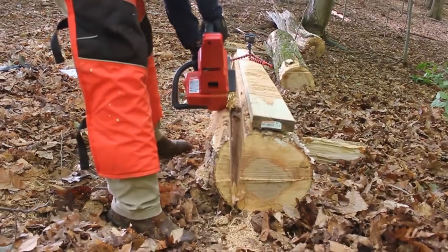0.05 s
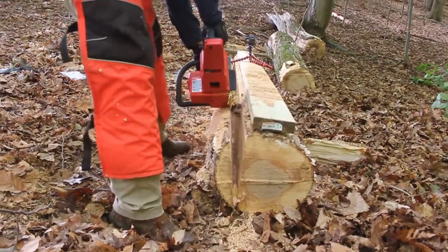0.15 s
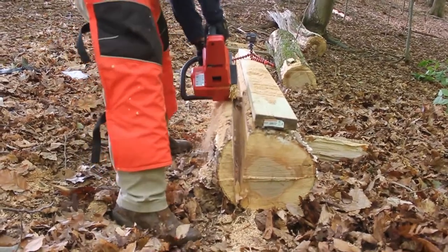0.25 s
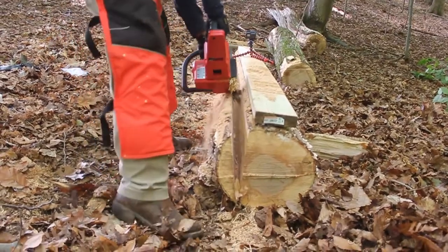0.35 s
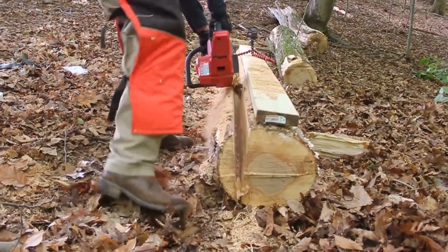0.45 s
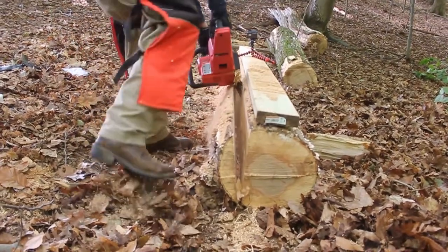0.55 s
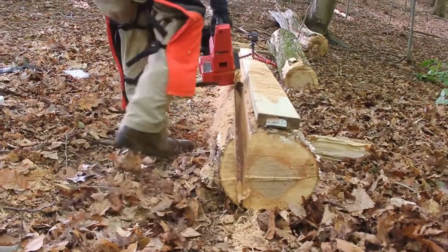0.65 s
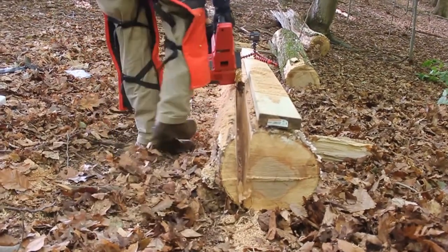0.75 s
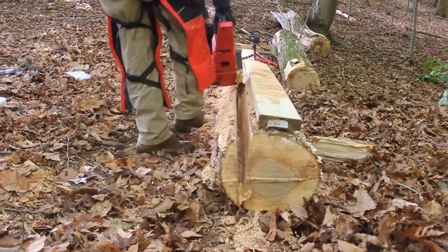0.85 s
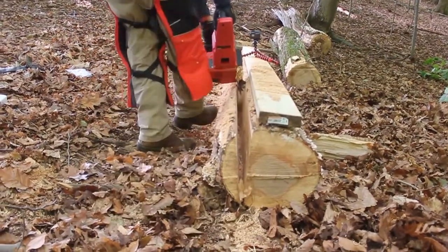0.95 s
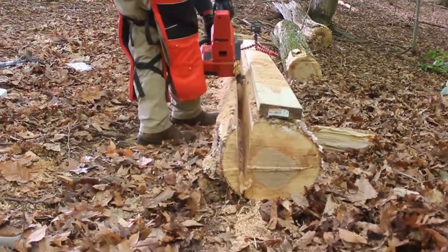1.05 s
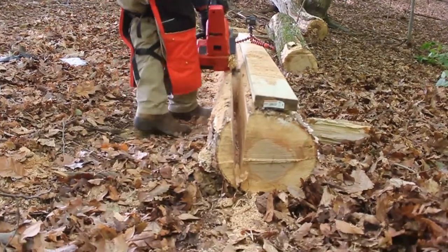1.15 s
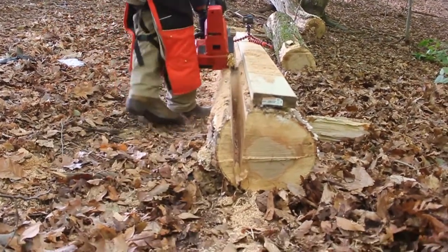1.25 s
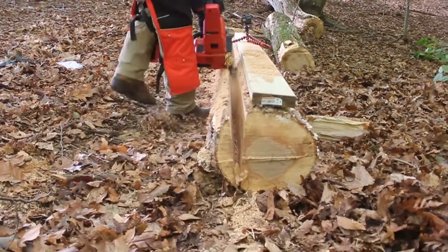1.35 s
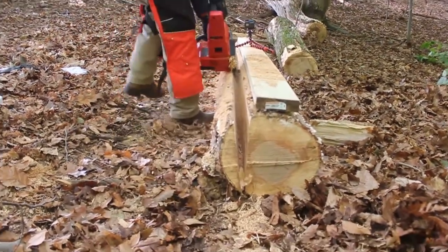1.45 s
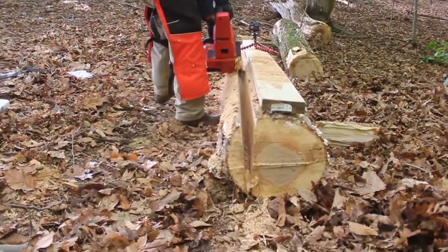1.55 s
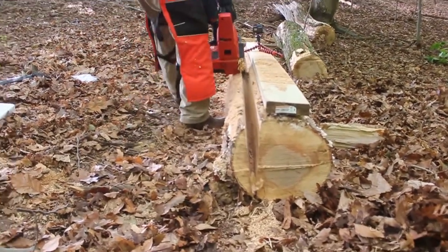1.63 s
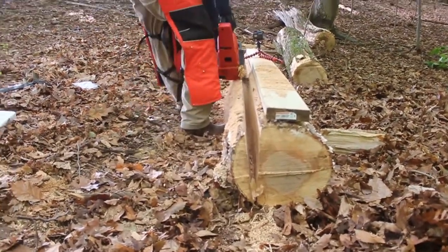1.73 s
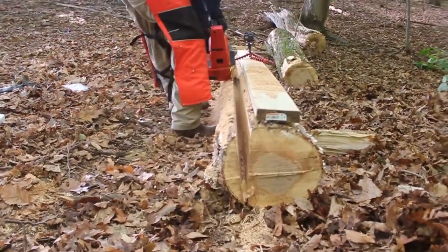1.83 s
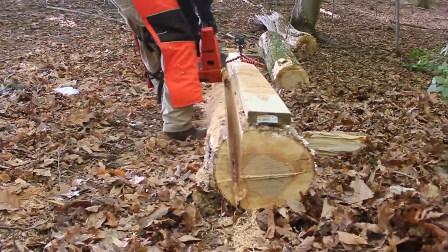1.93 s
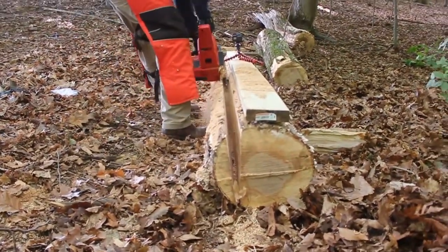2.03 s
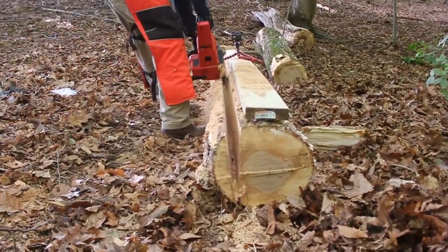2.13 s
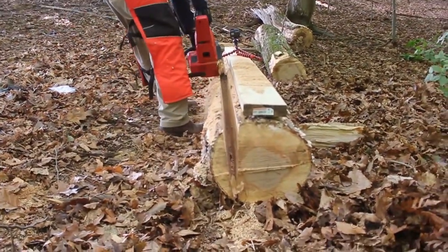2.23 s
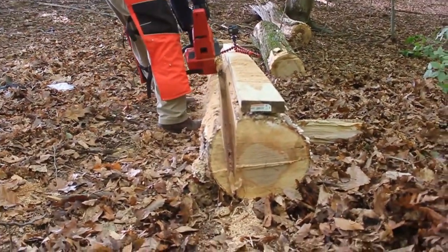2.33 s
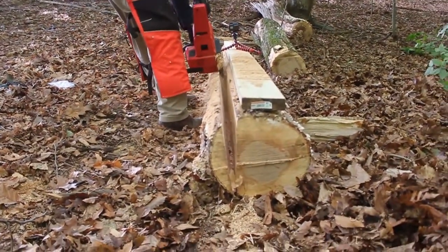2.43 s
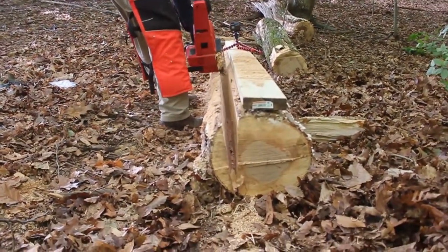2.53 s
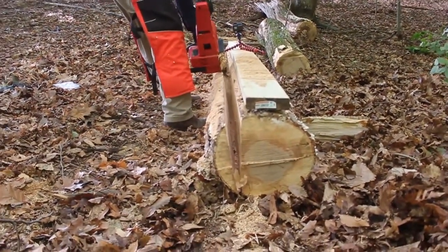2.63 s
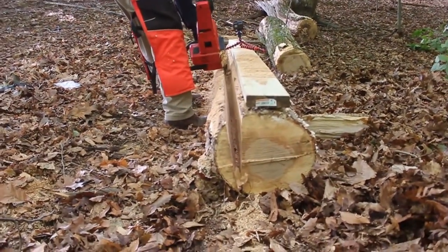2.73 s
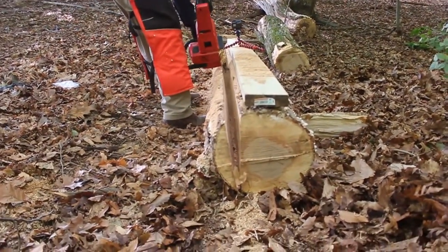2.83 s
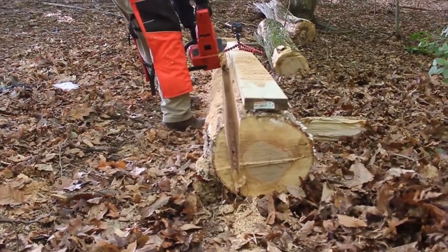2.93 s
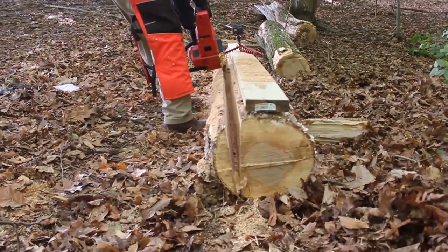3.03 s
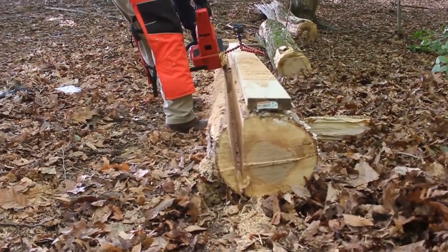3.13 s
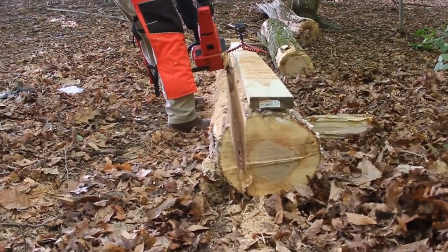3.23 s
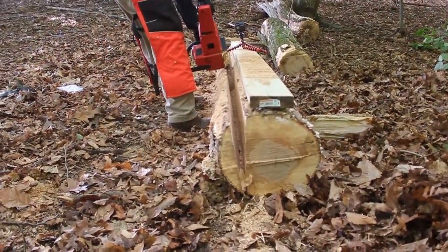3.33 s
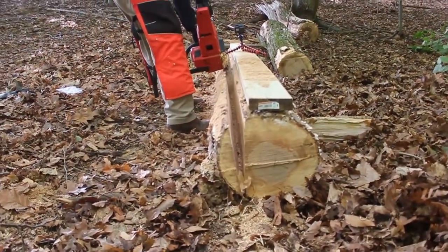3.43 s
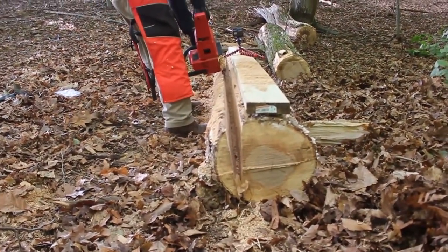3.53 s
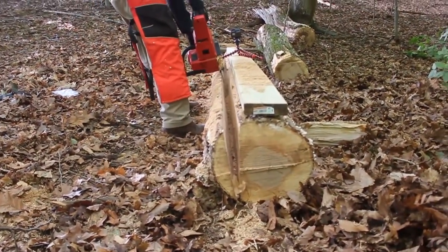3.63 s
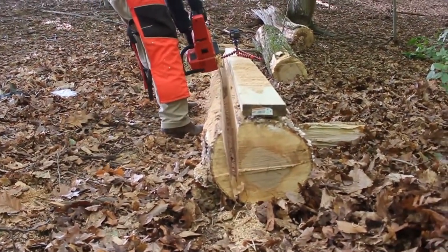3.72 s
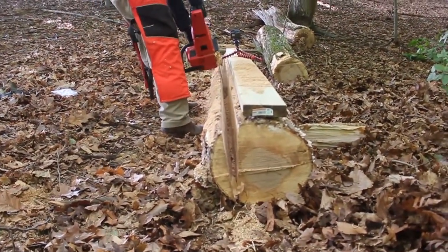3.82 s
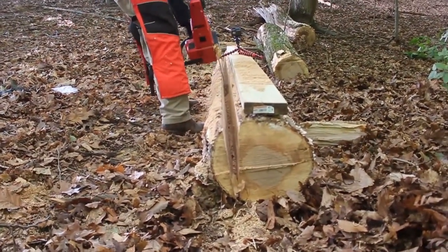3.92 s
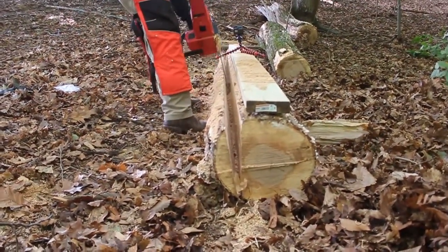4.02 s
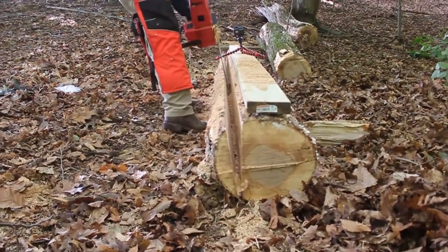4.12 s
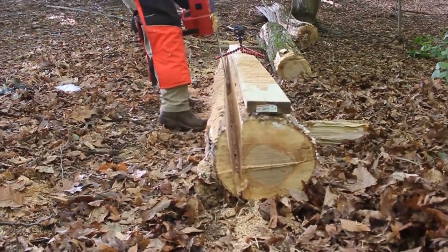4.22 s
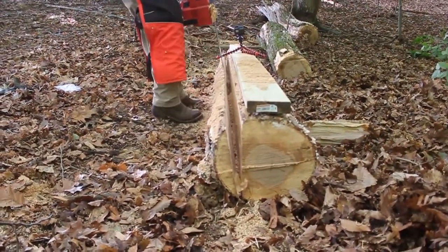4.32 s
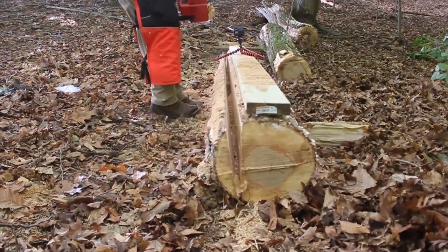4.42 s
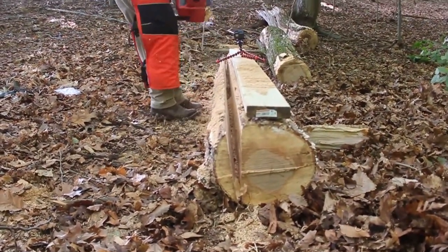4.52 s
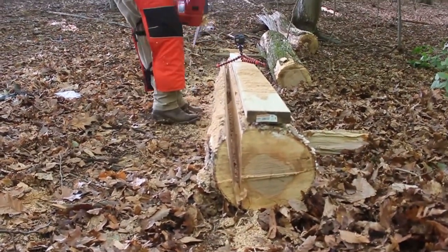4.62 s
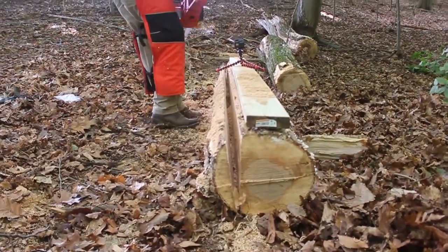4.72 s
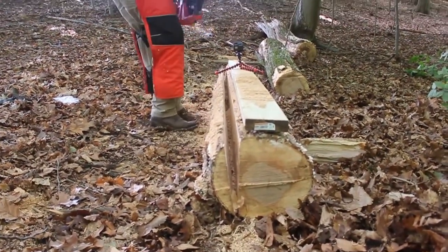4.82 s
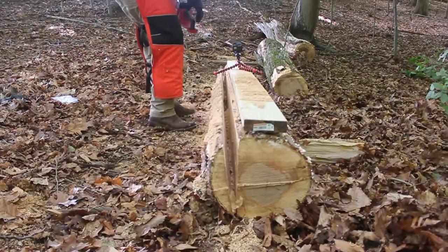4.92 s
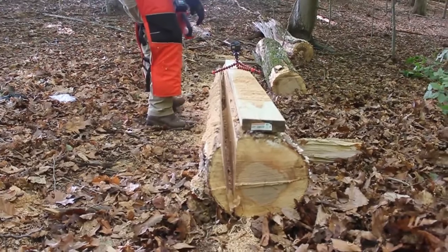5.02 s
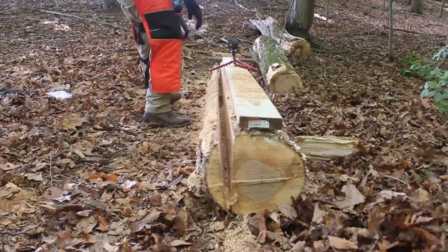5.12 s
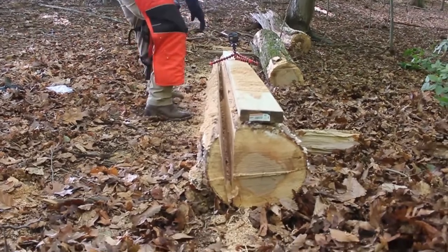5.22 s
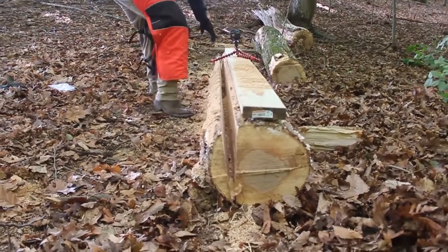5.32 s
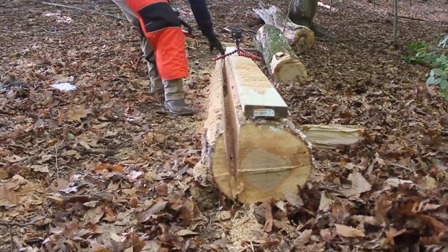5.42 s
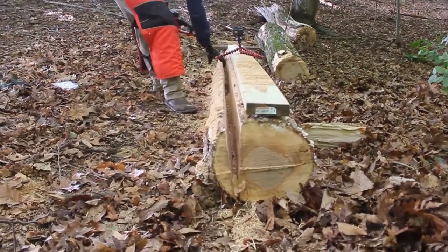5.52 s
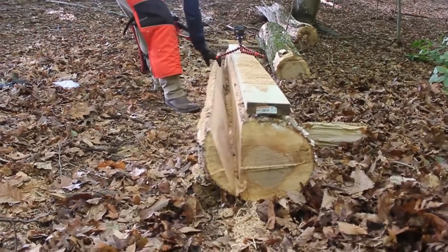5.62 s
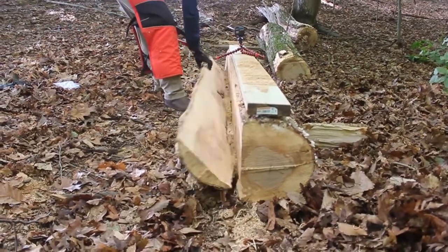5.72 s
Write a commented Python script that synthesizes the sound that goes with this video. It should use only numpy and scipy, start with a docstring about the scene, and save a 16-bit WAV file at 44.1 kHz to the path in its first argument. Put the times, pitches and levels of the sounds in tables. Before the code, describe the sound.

A bright electric whine with dense chain rattle and hissing chips falls away, pauses for a leafy step, and springs back almost instantly. The pitch sags and chatters in the cut, recovers, then slides down to rest with two metallic clacks. Afterwards come soil scuffs, crisp leaves, twig snaps and a burst of woody knocks with splintering. Dry open-air woodland, centred sound, faint hush and low breeze.

```python
"""In a wood, a battery chainsaw rips a log lengthwise: it coasts to a stop, starts again, labours and runs down.
One chain speed steers its whine (sines), rattle and clinks (filtered ticks), chips (noise), chatter and whistle.
The sawyer's boots scuff soil, crush dry leaves (noise and ticks) and snap twigs (short filtered bursts).
The slab knocks loose from the log as decaying modes with splintering noise.
Behind lie a faint hush and a light breeze that rumbles on the nearly mono microphone."""
import sys
import numpy as np
from scipy.fft import rfft, irfft, next_fast_len
from scipy.io import wavfile
from scipy.ndimage import map_coordinates

SR = 44100
rng = np.random.default_rng(int(sys.argv[2]) if len(sys.argv) > 2 else 0)


def file_out(sig):
    """Save sig as 16-bit WAV at sys.argv[1]."""
    # one column per channel
    cols = np.atleast_2d(sig).T
    # limit, then scale
    lim = np.clip(cols, -1, 1)
    pcm = np.round(lim * 32767).astype(np.int16)
    wavfile.write(sys.argv[1], SR, pcm)


N = 254016  # length in samples


def amp(db):
    """Decibels to gain."""
    return 10 ** (np.asarray(db) / 20)


def unit(x):
    """Scale to rms 1."""
    return x / np.sqrt(np.mean(x ** 2) + 1e-20)


def along(points, hz):
    """(Hz, dB) points read on a log frequency axis."""
    f, v = np.transpose(points)
    return np.interp(np.log(hz + 1), np.log(f + 1), v)


def curve(rows):
    """One value per sample from (s, value) rows."""
    return np.interp(np.arange(N) / SR, *np.transpose(rows))


def wobble(rate):
    """A smooth random curve, rate knots a second."""
    knots = rng.standard_normal(int(N * rate / SR) + 4)
    return map_coordinates(knots, [np.arange(N) * rate / SR])


def swell(s, half_length):
    """A smooth rise and fall of height 1 around time s; it falls to 1/e at half_length."""
    return np.exp(-((np.arange(N) / SR - s) / half_length) ** 2)


def coloured(x, colour):
    """x through a causal (minimum-phase) filter whose gain in dB is colour(Hz)."""
    size = 2 * next_fast_len(x.shape[-1] // 2 + 4096)
    cepstrum = irfft(np.log(amp(colour(np.fft.rfftfreq(size, 1 / SR)))))
    # folding the cepstrum onto positive time makes the filter causal
    cepstrum[1:size // 2] *= 2
    cepstrum[size // 2 + 1:] = 0
    return irfft(rfft(x, size) * np.exp(rfft(cepstrum)))[..., :x.shape[-1]]


def noise(points):
    """Noise of rms 1 with a (Hz, dB) spectrum."""
    return unit(coloured(rng.standard_normal(N), lambda hz: along(points, hz)))


def resonance(hz, centre, width):
    """Gain in dB of one band-pass resonance; doubled, it acts as two in a row."""
    return 20 * np.log10(np.abs(hz * width / (centre ** 2 - hz ** 2 + 1j * hz * width)) + 1e-6)


def peaks(rows, hz):
    """Summed lift in dB of (Hz, width Hz, dB) humps."""
    return sum(db / (1 + (2 * (hz - centre) / width) ** 2) for centre, width, db in rows)


def grains(rate, spread_db):
    """Random ticks of uneven size, rate a second, scaled to rms 1."""
    ticks = (rng.random(N) < rate / SR) * rng.standard_normal(N)
    return unit(ticks * amp(spread_db * np.clip(rng.standard_normal(N), -2, 2)))


def burst(t60):
    """A puff of noise that falls by 60 dB in t60 seconds."""
    t = np.arange(SR // 5) / SR
    return rng.standard_normal(len(t)) * 1000 ** (-t / t60)


def add(track, s, db, sound):
    """Mix a sound in at time s with the given peak level."""
    part = track[round(s * SR):][:len(sound)]
    part += amp(db) * sound[:len(part)] / np.abs(sound).max()


TEETH = 6  # teeth on the sprocket
FULL_HZ = 570  # teeth passing per second at nominal full speed
BOG_HZ = 13  # loss of speed at which the bar counts as buried in the wood
SURGE_DB = 4.5  # the chain is louder at the greatest acceleration
# Pace of the chain with the trigger held, dragged down by the cut.
# Each row: time in seconds, teeth passing the sprocket in Hz.
CHAIN_SPEED = [(1.06, 568.4), (1.14, 574.5), (1.44, 569.6), (1.6, 576.3), (1.78, 564.7), (1.87, 573.0),
               (2.02, 566.6), (2.2, 564.7), (2.41, 536.8), (2.48, 554.8), (2.66, 556.2), (2.8, 570.6),
               (3.23, 570.4), (3.31, 566.4), (3.41, 572.2), (3.69, 563.6)]


def saw():
    """One sprocket speed sets the whine, the rattle and ring of the links, the chips, chatter and whistle."""
    fast, coasting, rattle, ring = trigger()
    held_speed = curve(CHAIN_SPEED)
    speed = fast * held_speed
    teeth = 2 * np.pi * np.cumsum(speed) / SR  # phase in radians, one turn per tooth
    buried = np.clip((FULL_HZ - held_speed) / BOG_HZ, 0, 1)
    pull = np.maximum(np.gradient(fast), 0)
    surge = amp(SURGE_DB * pull / pull.max())
    chain = surge * (links(teeth, fast, rattle, ring) + chips(fast))
    motor = np.sqrt(surge) * whine(speed, teeth, buried, coasting)
    return chain + motor + kerf(teeth) + whistle(speed, teeth, buried) + clacks()


SPIN_UP_S = 0.083  # the motor soft-starts
SLACKEN_S = 0.058  # the chain goes slack after release
TAUT_RING_DB = -18  # ring of the driven chain over its rattle, before the mix in links()
# Pulls of the trigger.
# Each row: pressed in seconds, released in seconds, chain at rest in seconds, rattle in dB before the mix,
# share of full speed below which the rattle fades, ring of the coasting chain in dB over the rattle before the mix.
TRIGGER_PULLS = [(-1, 0.15, 0.58, -25, 0.51, -4.5), (0.866, 3.7, 4.122, -24, 0.31, -17)]


def trigger():
    """Share of full speed, coasting (0-1) and gains of rattle and ring as the motor starts and friction stops it."""
    t = np.arange(N) / SR
    spin, coasting, rattle, ring = np.zeros((4, N))
    for on, off, rest, rattle_db, fade_share, slack_db in TRIGGER_PULLS:
        rise = 1 - np.exp(-(np.maximum(t - on, 0) / SPIN_UP_S) ** 2)
        # after release, friction slows the chain at a steady rate
        share = rise * np.clip((rest - t) / (rest - off), 0, 1)
        free = np.clip((t - off) / SLACKEN_S, 0, 1) * (share > 0)
        level = amp(rattle_db) * share / np.hypot(share, fade_share)
        spin += share
        coasting += free
        rattle += level
        ring += level * amp(TAUT_RING_DB + free * (slack_db - TAUT_RING_DB))
    return spin, coasting, rattle, ring


# Broad colour of the saw. Each row: frequency in Hz, gain in dB.
SAW_COLOUR = [(90, -63), (190, -28), (290, -15), (600, -10.5), (1200, -10), (3000, -8), (6000, -9),
              (7000, -27.5), (11000, -19.5), (15600, -40)]
# Resonances of bar and housing. Each row: centre in Hz, width in Hz, lift in dB.
BODY_PEAKS = [(667, 177, 6), (887, 160, 11.5), (1167, 172, 10.5), (1519, 173, 10), (1918, 185, 5.5),
              (2180, 140, 3), (2700, 394, 8.5), (3545, 350, 4), (4130, 290, 2), (5080, 390, 7),
              (5345, 160, 9)]


def body(hz):
    """Gain in dB with which bar and housing radiate each frequency."""
    return along(SAW_COLOUR, hz) + peaks(BODY_PEAKS, hz)


def links(teeth, fast, rattle, ring):
    """Links slap the bar in step with the teeth; a slow chain breaks up into single clinks."""
    dense = np.sqrt(fast) * grains(rate=14000, spread_db=2)
    clinks = np.sqrt(1 - fast) * grains(rate=2500, spread_db=2)
    tooth_beat = 1 + 0.22 * np.cos(teeth) + 0.11 * np.cos(teeth / 2)
    unevenness = amp(0.16 * wobble(250) + 0.73 * wobble(14))
    slaps = unit((dense + clinks) * tooth_beat * unevenness)
    slapping = unit(coloured(slaps, lambda hz: body(hz) + along([(6000, 2.0), (7500, 0.5)], hz)))
    ringing = unit(coloured(slaps, lambda hz: 2 * resonance(hz, 5250, 430)))
    return amp(-1.0) * rattle * slapping + amp(2) * ring * ringing


SPRAY_GROWS = 1.3  # power of the chain's speed
# Colour of flying chips. Each row: frequency in Hz, relative level in dB.
CHIP_COLOUR = [(3000, -55), (6500, 4.5), (10700, 3), (15600, 0)]
# Chips thrown at full speed. Each row: time in seconds, level in dB before flutter and surge.
CHIP_LEVEL = [(.1, -37), (1.1, -37), (2.6, -40), (3.1, -35.5), (3.7, -37)]


def chips(fast):
    """Chips fly off as fluttering noise that grows with chain speed."""
    flutter_db = 1.0 * wobble(200)
    return noise(CHIP_COLOUR) * amp(curve(CHIP_LEVEL) + flutter_db) * fast ** SPRAY_GROWS


# all lines of the drive, and their change when buried or coasting
WHINE_DB, BURIED_DB, COASTING_DB = 1, -2.5, -4.4


def whine(speed, teeth, buried, coasting):
    """The drive's lines sink in the cut and on release, and vanish on a very slow chain."""
    fade_in = np.clip(speed / 100 - 0.4, 0, 1)
    level_db = WHINE_DB + BURIED_DB * buried + COASTING_DB * coasting
    return drive(speed, teeth) * fade_in * amp(level_db)


SOFTNESS_DB = 0.57  # scales the fading of upper lines on a slow chain, per multiple of the tooth rate
# Lines of the drive. Each row: multiple of the sprocket's turn rate, rms in dB at full speed before the whine's gains.
DRIVE_LINES = [(4, -53), (6, -33.5), (8, -73), (9, -47), (11.55, -39), (12, -31.5), (16, -47), (17, -43),
               (18, -48), (23.1, -43.5), (24, -41.5), (30, -40.5), (36, -43), (52, -42.5), (58, -47.5),
               (66.4, -48.5), (104, -54)]
# Bar and gear case ring when a line sweeps through.
# Each row: centre in Hz, width in Hz, lift in dB before the sweep is exaggerated.
FLARE_PEAKS = [(310, 55, 5.5), (856, 84, 3), (1600, 110, 4.5), (2017, 92, 11), (4200, 570, 5.5),
               (5750, 280, 5.5)]


def drive(speed, teeth):
    """Lines of sprocket and gears; each flares as it sweeps through a resonance."""
    grid = np.arange(0, SR // 2, 10)
    response = body(grid) + peaks(FLARE_PEAKS, grid)
    slowness = 1 - speed / FULL_HZ
    out = np.zeros(N)
    for order, db in DRIVE_LINES:
        k = order / TEETH
        lift_db = np.interp(k * speed, grid, response) - np.interp(k * FULL_HZ, grid, response)
        # teeth that meet slowly strike softly, so the upper lines fade first
        softness_db = SOFTNESS_DB * k * (slowness ** 2 + 3 * slowness ** 4)
        # links seat unevenly, which blurs the upper lines most, and more so on a slow chain
        slip = 0.1 * min(k, 6) * (1 + 2 * np.abs(slowness)) * wobble(110)
        flutter_db = 0.68 * min(k, 3) * wobble(45)
        out += amp(db + 1.12 * lift_db - softness_db + flutter_db) * np.sin(k * teeth + slip)
    return np.sqrt(2) * out * (speed / FULL_HZ) ** 0.053


# Fits of chatter in the cut. Each row: middle in seconds, half length in seconds, tone in dB, growl in dB.
CHATTER = [(1.702, .03, -41.5, -77), (2.182, .1, -29.5, -53), (2.393, 0.043, -40, -28),
           (2.535, 0.034, -39.5, -44)]


def kerf(teeth):
    """The bar chatters at half the tooth rate in short fits, and growls where the motor bogs down."""
    tone = np.sqrt(2) * np.sin(teeth / 2 + 0.44 * wobble(40))
    growl = noise([(250, -54), (400, -1), (520, -14.5), (620, -8), (900, -3), (1400, -25)])
    out = np.zeros(N)
    for s, half_length, tone_db, growl_db in CHATTER:
        out += swell(s, half_length) * (amp(tone_db) * tone + amp(growl_db) * growl)
    return out


# the whistle flares in one narrow resonance
WHISTLE_DB, WHISTLE_RING_HZ, WHISTLE_WIDTH_HZ = -42.5, 12240, 510
WHISTLE_LOAD_DB, WHISTLE_DRIFT_DB = 5.5, 3.5  # it grows under load; off load it comes and goes


def whistle(speed, teeth, buried):
    """A thin, wavering line of the motor, loudest when the load pulls its pitch into the resonance."""
    ratio = 22.22  # whistle pitch over tooth rate
    level_db = WHISTLE_DB + WHISTLE_LOAD_DB * buried
    level_db = level_db + resonance(ratio * speed, WHISTLE_RING_HZ, WHISTLE_WIDTH_HZ)
    drift_db = WHISTLE_DRIFT_DB * (1 - buried) * wobble(8.7) + 1.8 * wobble(39.6)
    return np.sqrt(2) * amp(level_db + drift_db) * np.sin(ratio * teeth + 0.71 * wobble(200))


# Tilt that makes a clack heavier than a link. Each row: frequency in Hz, gain in dB.
CLACK_TILT = [(600, 5), (2700, 4), (5000, -8.5), (12000, -4)]
# The chain snatches on the bar. Each row: start in seconds, peak in dB.
CLACKS = [(0.483, -27), (.548, -25.5), (0.872, -30), (0.893, -16.5), (4.063, -20), (4.129, -19.5)]


def clacks():
    """A snatching chain knocks the bar: short noise bursts coloured by the body."""
    out = np.zeros(N)
    for s, db in CLACKS:
        add(out, s, db, coloured(burst(t60=0.033), lambda hz: body(hz) + along(CLACK_TILT, hz)))
    return out


STEP_RISE_SHARE = 0.8  # a step rises in this share of its fade time
# Boots press into leaf litter.
# Each row: full weight in seconds, fade in seconds, scuff in dB and crackle in dB before the mix.
STEPS = [(.648, 0.064, -55.5, -45.5), (.83, 0.1, -57, -55), (4.17, 0.13, -53, -66),
         (4.32, 0.093, -53.5, -56.5), (4.455, 0.075, -48, -49), (4.8, 0.21, -57, -62),
         (4.92, 0.078, -56, -53.5), (5.035, 0.084, -53, -51), (5.115, 0.039, -49, -40.5),
         (5.26, 0.087, -49.5, -47.5), (5.34, 0.28, -46.5, -48), (5.52, .08, -53.5, -69),
         (5.7, 0.093, -41.5, -51), (5.76, 0.054, -40, -44)]
# Colour of crushed leaves. Each row: frequency in Hz, relative level in dB.
LEAVES = [(300, -41), (1200, -20), (3300, 0), (5500, -1), (7600, -11.5), (11300, -9.5), (15600, -18)]
# Colour of soles on soil. Each row: frequency in Hz, relative level in dB.
SOIL = [(40, -21.5), (200, -3), (800, 3), (1300, -3.5), (2500, -7), (6000, -18)]
# Twigs snap underfoot. Each row: start in seconds, peak in dB, pitch in Hz.
TWIGS = [(.628, -27.5, 3220), (.705, -37, 2500), (.817, -36, 2840), (0.826, -38, 4500), (4.355, -34, 1700),
         (4.41, -24.5, 2980), (4.819, -41, 2800), (5.029, -47, 2500), (5.407, -22.5, 2770),
         (5.736, -26, 3170), (5.757, -17.5, 3900)]
# Dull thuds of a boot set down. Each row: start in seconds, peak in dB.
THUDS = [(0.807, -48), (5.519, -30)]


def footsteps():
    """Soles thud and scuff on the soil, crush dry leaves and snap twigs."""
    t = np.arange(N) / SR
    scuff, crackle = np.zeros((2, N))
    for s, fade, scuff_db, crackle_db in STEPS:
        weight = np.exp(-np.maximum((s - t) / STEP_RISE_SHARE, t - s) / fade)
        # overlapping steps add in power
        scuff = np.hypot(scuff, amp(scuff_db) * weight)
        crackle = np.hypot(crackle, amp(crackle_db) * weight)
    crumbs = grains(rate=1300, spread_db=4) + 0.89 * rng.standard_normal(N)
    out = amp(1.0) * crackle * unit(coloured(crumbs, lambda hz: along(LEAVES, hz)))
    out += amp(3.0) * scuff * noise(SOIL) * amp(2.5 * wobble(70))
    for s, db, pitch in TWIGS:
        add(out, s, db, coloured(burst(t60=0.016), lambda hz: 2 * resonance(hz, pitch, 0.73 * pitch)))
    for s, db in THUDS:
        add(out, s, db, coloured(burst(t60=0.0056), lambda hz: resonance(hz, 275, 21)))
    return out


# The slab knocks on the log. Each row: start in seconds, peak in dB, splintering in dB relative to the knock.
KNOCKS = [(4.69, -42, -24), (4.766, -37.5, -23), (4.777, -36, -21), (5.518, -27, 0), (5.617, -40, 10),
          (5.6301, -11.5, -17.5), (5.6393, -16, -6), (5.6466, -20, 0.5), (5.6557, -10, -9.5),
          (5.6592, -16.5, -17), (5.713, -30, 3), (5.757, -21, 0)]
# Modes of the slab. Each row: frequency in Hz, typical relative level in dB, 60 dB decay in seconds.
SLAB_MODES = [(290, -18, 0.099), (613, -2.5, 0.02), (766, 6, 0.02), (984, -0.5, 0.021), (1230, -6, 0.028),
              (1540, -11, 0.028), (1950, -16, 0.023), (2380, -15, 0.024)]


def slab():
    """Each contact rings the slab's decaying modes at new strengths and tears a few fibres."""
    out = np.zeros(N)
    t = np.arange(SR // 5) / SR
    hz, level, t60 = np.transpose(SLAB_MODES)[:, :, None]
    for s, db, splinter_db in KNOCKS:
        strength = amp(level + rng.normal(0, 1.6, hz.shape) - 60 * t / t60)
        modes = strength * np.sin(2 * np.pi * (hz * t + rng.random(hz.shape)))
        soft_onset = 1 - np.exp(-t / 0.00061)
        add(out, s, db, np.sum(modes, axis=0) * soft_onset)
        fibres = coloured(burst(t60=0.045), lambda f: 2 * resonance(f, 1840, 2400))
        add(out, s, db + splinter_db, fibres)
    return out


# Breeze on the microphone. Each row: time in seconds, rms in dB.
BREEZE = [(0, -62), (1, -61.5), (4.2, -56.5), (5.2, -38.5)]
# Colour of the breeze's rumble. Each row: frequency in Hz, relative level in dB.
RUMBLE = [(15, 2), (30, -17.5), (60, -32), (120, -23.5), (250, -40), (1000, -48)]
# Colour of still air among the trees. Each row: frequency in Hz, relative level in dB.
WOODS = [(100, -9.5), (250, -8), (1100, -20.5), (1700, -16), (15600, -30)]


def air():
    """Faint hush of the wood and a breeze that differs a little between the two microphone ports."""
    apart = np.array([[1], [-1]])
    rumble = noise(RUMBLE) + 0.5 * apart * noise(RUMBLE)
    return amp(curve(BREEZE)) * unit(rumble) + amp(-60.0) * noise(WOODS)


def scene():
    """Saw, steps and slab sit straight ahead; only the breeze differs from side to side."""
    return saw() + footsteps() + slab() + air()


TOP_HZ = 15850  # the treble ends sharply here


def record(dry):
    """Keep only what lies below TOP_HZ; the scene's treble ends sharply there."""
    size = next_fast_len(N + SR // 4)
    below_top = np.fft.rfftfreq(size, 1 / SR) < TOP_HZ
    return irfft(rfft(dry, size) * below_top, size)[:, :N]


dry = scene()
out = record(dry)
file_out(out)
```